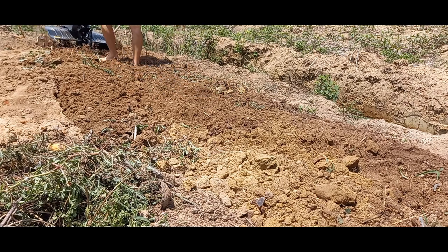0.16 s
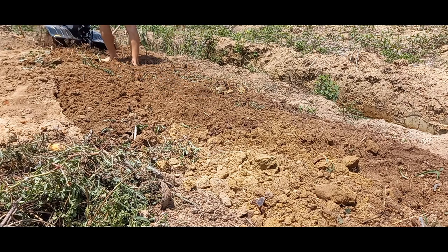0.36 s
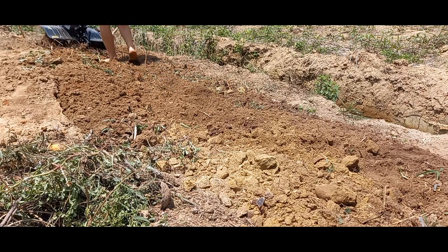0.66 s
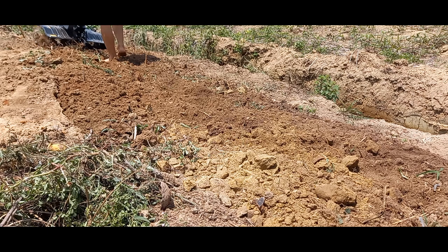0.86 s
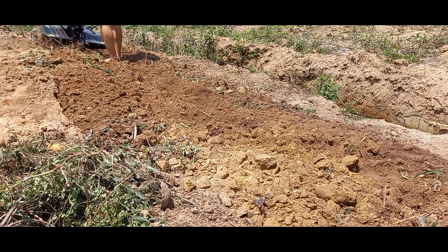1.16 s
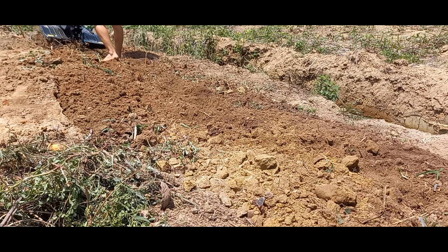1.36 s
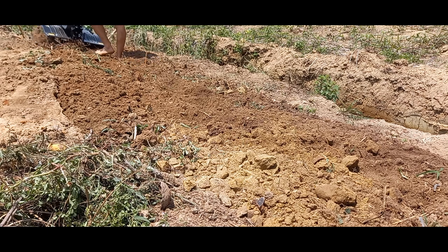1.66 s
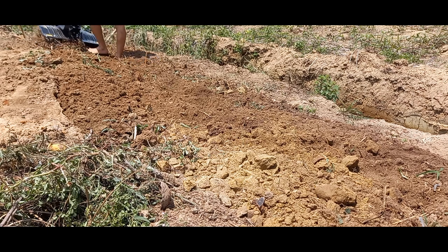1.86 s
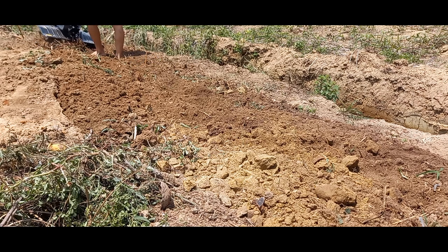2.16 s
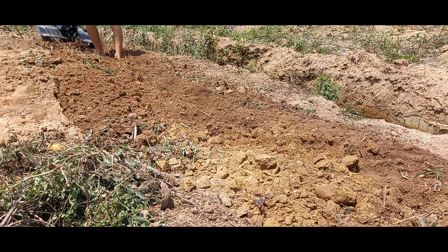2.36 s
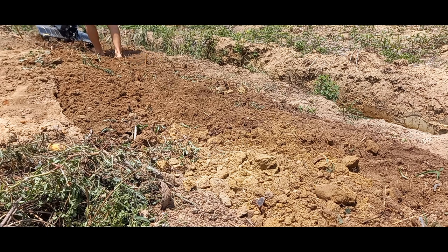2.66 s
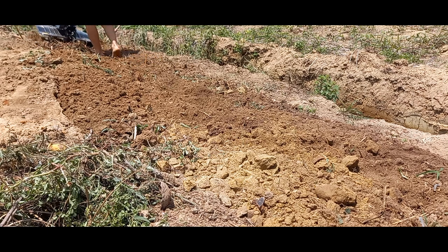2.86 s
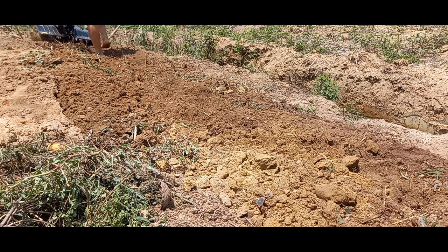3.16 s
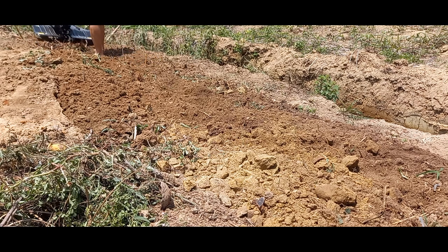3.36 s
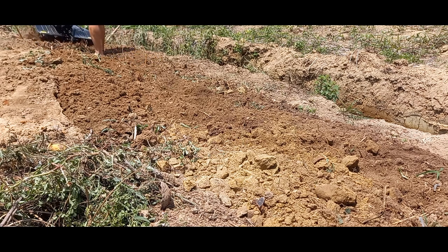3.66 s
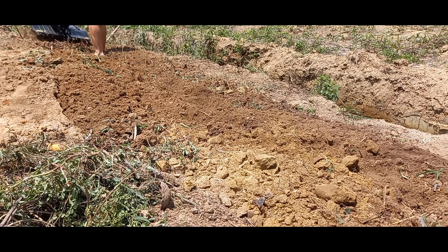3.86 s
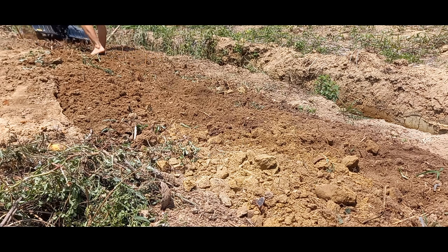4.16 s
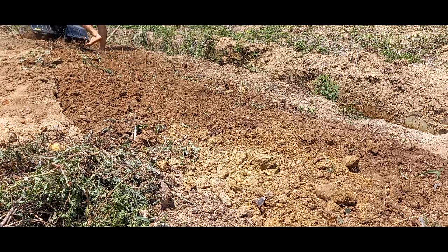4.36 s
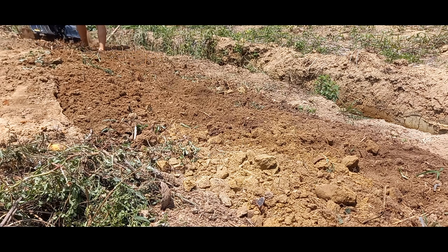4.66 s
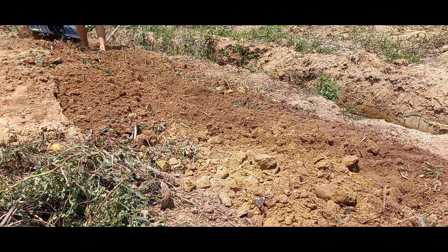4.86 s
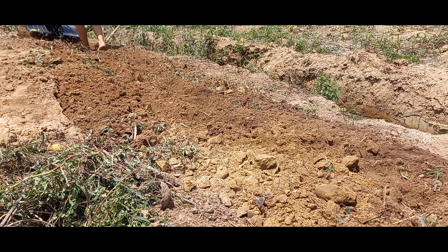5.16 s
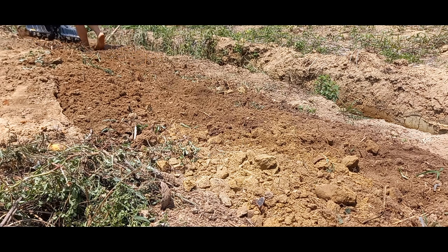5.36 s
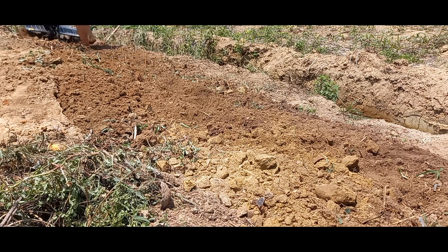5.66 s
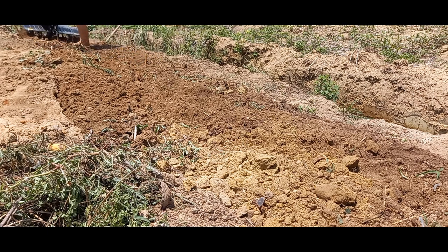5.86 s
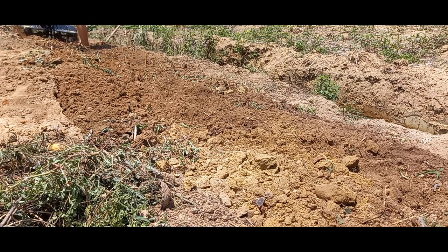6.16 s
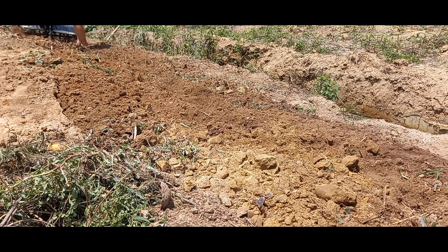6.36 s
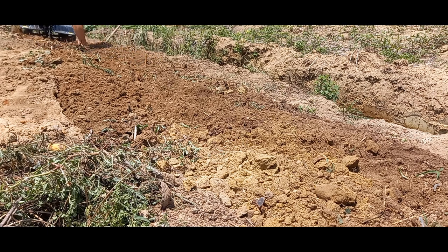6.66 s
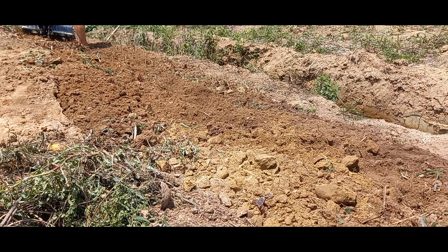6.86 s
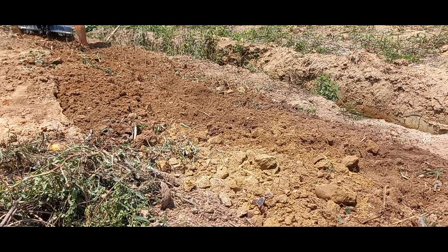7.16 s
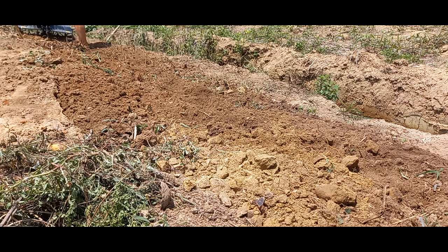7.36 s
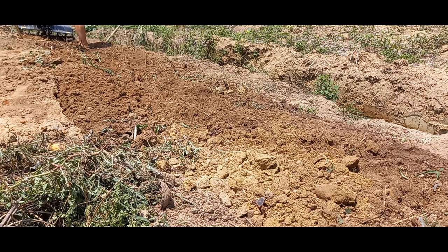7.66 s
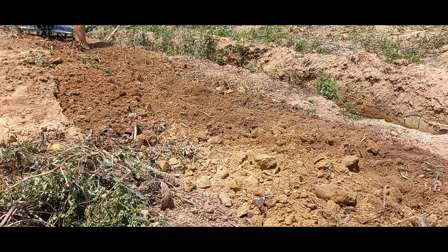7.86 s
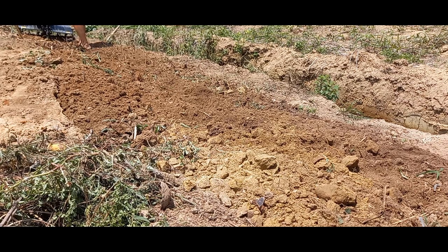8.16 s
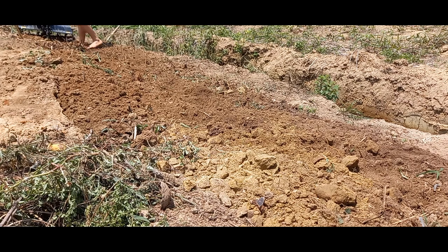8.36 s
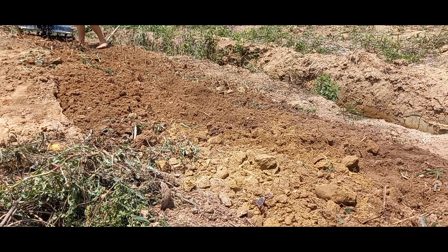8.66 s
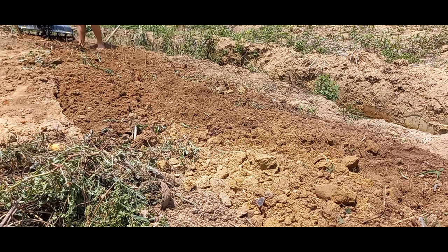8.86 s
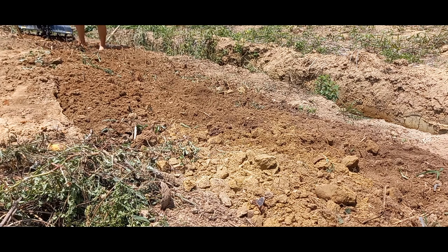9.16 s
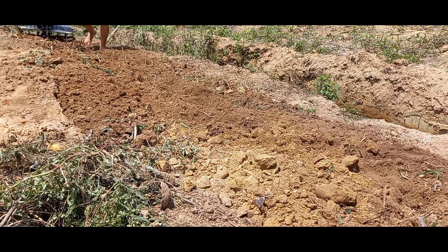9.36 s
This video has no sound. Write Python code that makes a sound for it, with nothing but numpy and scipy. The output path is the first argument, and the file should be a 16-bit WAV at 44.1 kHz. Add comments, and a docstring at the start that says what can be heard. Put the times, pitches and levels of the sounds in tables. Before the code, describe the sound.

A small single-cylinder four-stroke petrol tiller runs outdoors, to the left of a stereo microphone. From 0 to 7.2 seconds it fires steadily about 25 times a second: a deep muffler throb around 100 to 150 hertz, sharp engine clacks, rattling tin covers and uneven fan and belt whirr, slowly softening as it moves off while drive grinding grows. Dry crumbs patter, and tines scrape stones in short gritty hisses, notably near 1.5, 3.6, 4.2, 5.4 and 6.9 seconds. Harder piston slaps come around 0.8 to 1.1 and 5.6. At 7.25 the drive is released with a bright scrape; the engine lurches and stumbles. From 7.8 it coasts in duller, ever slower chuffs, with knocks strongest near 8.3 and low frame rings. After about 8.8, gulps of air and brief chain groans follow, with tiny scrapes near 9.3 and 9.5, still slowing at the end. A faint low rumble lies underneath.

```python
"""A single-cylinder four-stroke petrol tiller digs dry soil: each firing rings the muffler and clacks the engine.
Coloured noise, pulsed by the firings, gives gear whirr and rattling covers; grains patter and tines scrape stones.
Then the drive is let go, the scrapes lose their showers of soil, and the starved engine stumbles.
Last it coasts in ever slower chuffs with gulps of air, knocks, frame rings and chain groans, still slowing
at the end. A faint outdoor rumble, made of low noise, lies under it all."""
import sys
import numpy as np
from scipy import signal
from scipy.fft import rfft, irfft, next_fast_len
from scipy.io import wavfile
from scipy.ndimage import map_coordinates

SR = 44100
rng = np.random.default_rng(int(sys.argv[2]) if len(sys.argv) > 2 else 0)


def to_wav(sig):
    """Store sig (one row per channel, or 1-D mono) as 16-bit WAV at the path in sys.argv[1].

    Samples outside -1..1 are clipped; the rate is SR.
    """
    pcm = np.clip(np.atleast_2d(sig), -1, 1) * 32767
    pcm = np.round(pcm).astype(np.int16)
    wavfile.write(sys.argv[1], SR, pcm.T)  # frames by channels


N = 418950  # length in samples


def amp(db):
    """Decibels to gain."""
    return 10 ** (np.asarray(db) / 20)


def unit(x):
    """Scale to rms 1."""
    return x / np.sqrt(np.mean(x ** 2) + 1e-20)


def along(points, hz):
    """Read (frequency, value) points on a log frequency axis."""
    f, v = np.transpose(points)
    return np.interp(np.log(hz + 1), np.log(f + 1), v)


def curves(rows):
    """Draw one value per sample for each column after the time."""
    s, *cols = np.transpose(rows)
    return [np.interp(np.arange(N) / SR, s, c) for c in cols]


def wobble(rate):
    """A smooth random curve through `rate` random knots a second."""
    knots = rng.standard_normal(int(N * rate / SR) + 4)
    return map_coordinates(knots, [np.arange(N) * rate / SR])


def filtered(x, response):
    """Shape x by a complex response of frequency."""
    m = next_fast_len(N + SR // 2)
    spectrum = rfft(x, m) * response(np.fft.rfftfreq(m, 1 / SR))
    return irfft(spectrum, m)[..., :N]


def add(track, s, sound):
    """Mix a sound into a track at time s."""
    part = track[max(round(s * SR), 0):][:len(sound)]
    part += sound[:len(part)]


def strike(times, sizes, shape):
    """Place one scaled copy of the shape at each time."""
    blows = np.bincount(np.clip(times * SR, 0, N).astype(int), sizes, N + 1)
    return signal.fftconvolve(blows, shape)[:N]


def burst(rise, decay):
    """An envelope of peak 1 that swells and dies away (times in s)."""
    t = np.arange(SR // 4) / SR
    shape = (1 - np.exp(-(t / rise) ** 2)) * np.exp(-t / decay)
    return shape / shape.max()


# likeness of the left and right noise: hz, correlation
LIKENESS = [(30, 0.37), (70, 0.5), (150, 0.61), (450, 1), (650, 0.76), (1000, 1), (3500, 0.76),
            (4500, 0.73), (7000, 0.67), (10000, 0.2), (15000, .2)]


def noise(colour):
    """Coloured noise of rms 1 at both ports, mixed from mid and side so that it widens by frequency."""
    def response(hz):
        turn = np.arccos(np.clip(along(LIKENESS, hz), -1, 1)) / 2
        return amp(along(colour, hz)) * np.array([np.cos(turn), np.sin(turn)])
    mid, side = filtered(rng.standard_normal((2, N)), response)
    return unit(np.array([mid + side, mid - side]))


def resonant(modes):
    """The noise colour (Hz, dB) of a set of resonances; each is 6 dB down one width from its centre."""
    hz = np.arange(20, SR // 2, 5)
    power = sum(amp(db) ** 2 / (1 + ((hz - centre) / width) ** 2) ** 2 for centre, width, db in modes)
    return np.transpose([hz, 10 * np.log10(power + 1e-12)])


# engine speed under power: time_s, firings_per_s
ENGINE_SPEED = [(0.0, 24.534), (0.287, 25.352), (0.519, 24.675), (1.389, 25.405), (1.615, 24.59),
                (2.147, 25.183), (2.27, 24.519), (3.23, 24.728), (3.624, 25.166), (3.67, 24.478),
                (4.17, 25.31), (5.16, 24.531), (5.331, 25.513), (5.62, 24.195), (6.252, 25.095),
                (7.193, 24.667), (7.51, 26.74), (7.75, 23.079)]
COAST_S, COAST_RATE = 7.781, 24.44  # start of coasting (s), cycles a second then
FRICTION, BURN_OFF_S = 12.37, 0.09  # cycles a second lost each second, time for the last fuel to burn off (s)


def speed():
    """Engine cycles a second: driven by fuel, then braked by steady friction as the last fuel burns off."""
    t = np.arange(N) / SR
    since = np.maximum(t - COAST_S, 0)
    braked = since - BURN_OFF_S * (1 - np.exp(-since / BURN_OFF_S))
    return np.where(t < COAST_S, curves(ENGINE_SPEED)[0], COAST_RATE - FRICTION * braked)


def firings(jitter=0.0001):
    """One firing per engine cycle, with a slight timing jitter (s), until the power ends."""
    cycles = 0.1 + np.cumsum(curves(ENGINE_SPEED)[0]) / SR
    times = np.interp(np.arange(int(cycles[-1])), cycles, np.arange(N) / SR)
    times = times[times < ENGINE_SPEED[-1][0] + 0.01]
    return times + jitter * rng.standard_normal(len(times))


RELEASE_S, RELEASE_TAKES_S = 7.25, 0.1  # the drive is let go


def unloaded(t):
    """The load coming off: 0 while the tines dig, 1 once the drive is let go."""
    return np.clip((t - RELEASE_S) / RELEASE_TAKES_S, 0, 1)


def level(law):
    """A part's level in dB: it changes as the tiller moves off, sheds its load and slows."""
    start_db, away_db, released_db, slowed_db = law
    t, rate = np.arange(N) / SR, speed()
    moving_db = start_db + away_db * t
    return moving_db + released_db * unloaded(t) + slowed_db * np.log2(rate[0] / rate)


# how muffler pitch and knock strength change through the coast: time_s, muffler_pitch_ratio,
# knock_db (before the knock gain)
COAST_TONE = [(7.85, 1, -38), (8.02, .86, -32.5), (8.27, 1.09, -28), (8.55, 0.944, -32), (8.85, 0.9, -35.5),
              (9.4, 0.96, -43.5)]
# heavy lurches, as it stumbles and late in the coast: time_s, chuff_db, muffler_pitch_ratio,
# knock_db (before the knock gain)
HEAVY_LURCHES = [(7.394, -16, .62, -28), (7.779, -19, 0.84, -30), (7.9478, -14.5, 0.83, -29.5),
                 (9.339, -20, .74, -38.5)]
# in the slowest cycles, all but the last, a deep gulp of air follows each chuff
GULP_BELOW_RATE, GULP_AFTER_S = 12, 0.034  # cycles a second, s
GULP_DB, GULP_PITCH, GULP_KNOCK_DB = -18.5, 0.617, -47  # knock before the knock gain


def strokes(chuff_db=-9.0, halving_db=-6.0, scatter_db=1.3):
    """One chuff a cycle, softer as the engine slows, with gulps and lurches: s, chuff dB, pitch, knock dB."""
    t = np.arange(round(COAST_S * SR), N) / SR
    rate = speed()[-len(t):]
    cycles = np.cumsum(rate) / SR
    times = np.interp(np.arange(int(cycles[-1]) + 1), cycles, t)
    rates = np.interp(times, t, rate)
    s, pitch, knock_db = np.transpose(COAST_TONE)
    db = chuff_db + halving_db * np.log2(COAST_RATE / rates)
    db = db + scatter_db * rng.standard_normal(len(times))
    chuffs = np.column_stack([times, db, np.interp(times, s, pitch), np.interp(times, s, knock_db)])
    slow = times[rates < GULP_BELOW_RATE][:-1]
    gulps = [(s + GULP_AFTER_S, GULP_DB, GULP_PITCH, GULP_KNOCK_DB) for s in slow]
    return np.vstack([chuffs, gulps, HEAVY_LURCHES])


def muffler(colour, pitch=1, dull_db=0, corner_hz=170, size=8192):
    """The muffler's causal ring after one puff of gas, peak 1, losing dull_db an octave above the corner."""
    hz = np.fft.rfftfreq(size, 1 / SR)
    octaves = np.log2(np.clip(hz / corner_hz, 1, 4))  # the tilt stops two octaves up
    db = along(colour, hz / pitch) - dull_db * octaves
    # folding the cepstrum forward in time gives the minimum-phase ring
    cepstrum = irfft(np.log(amp(db)))
    folded = 2 * cepstrum[:size // 2] * (np.arange(size // 2) > 0)
    ring = -irfft(np.exp(rfft(folded, size)))
    return ring / np.abs(ring).max()


# muffler resonances while firing: hz, relative_db
FIRED_MUFFLER = [(25, -35), (50, -36), (78, -39.5), (99, 6.5), (124, 11), (150, 11.5), (174, -3),
                 (198, -12.5), (225, 2.5), (250, -3), (300, -10.5), (360, -31), (480, -27.5), (800, -50.5)]
# muffler resonances while coasting and for the unloaded share of the firings: hz, relative_db
COASTING_MUFFLER = [(25, -34), (50, -33), (75, -20), (100, -3.5), (135, 7), (165, -1.5), (198, -14),
                    (228, -5.5), (260, -15), (300, -13), (345, -24.5), (410, -44), (520, -34), (800, -65)]
# firing level (dB), its fall as the tiller moves off and its extra fall once starved of fuel
BOOM_DB, BOOM_DB_PER_S, STARVE_S, STARVE_DB_PER_S = -14, -0.1045, 7.6, -42
# weak chuffs are dull, strong ones bark: dividing level, tilt (dB an octave per dB), limit of the bark (dB)
SOFT_BELOW_DB, DULLING, BRIGHT_RANGE_DB = -13, 1.9, 2.3


def exhaust(times, coasting, scatter_db=0.5, coast_db=0, return_s=0.00766, return_share=0.11,
            light_share=0.25, light_pitch=1.1, heat_pitch=0.015, heat_swing=0.35):
    """Puffs ring the muffler, higher in hotter gas; part changes resonance when the load comes off."""
    def even(ring):  # equal power for every ring at the usual firing rate
        return ring * np.sqrt(SR * np.median(np.diff(times)) / np.sum(ring ** 2))

    starved = np.maximum(times - STARVE_S, 0)
    size_db = BOOM_DB + BOOM_DB_PER_S * times + STARVE_DB_PER_S * starved
    sizes = amp(size_db + scatter_db * rng.standard_normal(len(times)))
    light = np.clip(light_share, 0, 1) * unloaded(times)
    loaded = sizes * (1 - light)
    heat = np.interp(times * SR, np.arange(N), wobble(3))
    hot = np.clip(0.5 + heat_swing * heat, 0, 1)
    boom = strike(times, loaded * hot, even(muffler(FIRED_MUFFLER, 1 + heat_pitch)))
    boom += strike(times, loaded * (1 - hot), even(muffler(FIRED_MUFFLER, 1 - heat_pitch)))
    boom += strike(times, sizes * light, even(muffler(COASTING_MUFFLER, light_pitch)))
    for s, db, pitch, _ in coasting:
        dull_db = DULLING * max(SOFT_BELOW_DB - db, -BRIGHT_RANGE_DB)
        chuff = amp(db + coast_db) * muffler(COASTING_MUFFLER, pitch, dull_db)
        add(boom, s, chuff)
        add(boom, s + return_s / pitch, return_share * chuff)  # the wave returns from the pipe's open end
    return boom


# labouring spells in which every piston slap is hard: start_s, end_s, over_usual_slap_db
LABOURING_SPELLS = [(.78, 1.13, 6), (5.6, 5.72, 8), (6.13, 6.17, 7.5)]
# colour of the engine's clack: hz, relative_db_per_hz
CLACK_COLOUR = [(300, -22), (1200, -7), (2200, -12), (3200, -7.5), (4500, -11.5), (6200, 1.5), (8000, -8.5),
                (16000, -9.5)]
# colour of the rattling tin covers: hz, relative_db_per_hz
RATTLE_COLOUR = [(1000, -31.5), (3000, -9), (4000, -9), (5000, -6.5), (6400, -4.5), (7200, -10),
                 (9000, -16), (16000, -13.5)]


def clatter(times, rattle_db, clack_db=6.5, shake_db=0, loose_db=-4.0, scatter_db=1.0, slap_db=1,
            slap_spread_db=5.0):
    """Each firing gates noise into a clack and a piston slap of varied hardness, and shakes the tin covers."""
    sizes = amp(scatter_db * rng.standard_normal(len(times)))
    snap = burst(rise=0.0004, decay=0.003)
    clack = amp(clack_db) * strike(times + 0.00022, sizes, snap)
    hardness_db = slap_spread_db * np.minimum(rng.standard_normal(len(times)), 2)
    for start, end, db in LABOURING_SPELLS:
        hardness_db[(times > start) & (times < end)] = db
    slap = strike(times, amp(slap_db + hardness_db), burst(rise=0.00026, decay=0.0033))
    shake = strike(times, sizes, burst(rise=0.0058, decay=0.0063))
    loose = amp(loose_db + 1.68 * wobble(350))  # rattle that goes on between firings
    covers = np.hypot(amp(shake_db) * shake, loose)
    metal = np.hypot(clack, slap) * noise(CLACK_COLOUR) + covers * noise(RATTLE_COLOUR)
    return amp(rattle_db) * metal


# colour of the knocking drive: hz, relative_db_per_hz
KNOCK_COLOUR = [(400, -1.5), (800, -9.5), (1400, 1), (2200, -2.5), (3100, 5.5), (5500, -1.5), (7000, -4.5),
                (10000, -9), (16000, -17)]


def knocks(coasting, gain_db=5):
    """The slack drive knocks in noise bursts as the coasting piston labours over each compression."""
    envelope = np.zeros(N)
    for s, _, _, db in coasting:
        add(envelope, s - 0.002, amp(db + gain_db) * burst(rise=0.0019, decay=0.0097))
    return envelope * noise(KNOCK_COLOUR)


# frame modes: hz, re_chuff_db (before a random spread), t60_s
FRAME_MODES = [(83.3, -10.5, 0.23), (294, -22, 0.078), (327, -19, 0.1), (625, -28, 0.087)]


def frame(coasting, spread_db=2):
    """The lurching engine sets the frame's decaying sine modes ringing from one stroke into the next."""
    out, t = np.zeros(N), np.arange(SR // 4) / SR
    chance = rng.standard_normal((len(coasting), len(FRAME_MODES)))
    for (s, chuff_db, _, _), luck in zip(coasting, chance):
        for (hz, db, t60), change in zip(FRAME_MODES, luck):
            fade = np.exp(-np.log(1000) * t / t60) * (1 - np.exp(-t / 0.0084))
            gain = amp(chuff_db + db + spread_db * change)
            add(out, s, gain * fade * np.sin(2 * np.pi * hz * t))
    return out


# colour of the fan and belt whirr: hz, relative_db_per_hz
WHIRR_COLOUR = [(100, -14), (300, 3), (420, -7.5), (590, -7), (770, -17), (900, -9.5), (1200, -3),
                (1500, -4.5), (1720, -1.5), (1820, -10.5), (1980, -3), (2500, -6), (3200, -15),
                (5000, -22.5)]
# fan shroud resonances: hz, width_hz, relative_db
SHROUD_MODES = [(417, 25, -2), (880, 20, -6.5), (1031, 24, -1), (1158, 40, 0), (1250, 31, -3),
                (1751, 26, 0), (1974, 84, -2), (2170, 30, -2)]


def gears(times, whirr_db, gain_db=1, shroud_db=-5, surge_db=3.5):
    """Fan and belt noise whirrs unevenly through the shroud, surging with each firing."""
    surge = strike(times, np.ones(len(times)), burst(rise=0.0012, decay=0.0085))
    uneven_db = 1.3 * wobble(200) + 0.5 * wobble(17)
    level_db = whirr_db + gain_db + surge_db * (surge - 0.5) + uneven_db
    return amp(level_db) * (noise(WHIRR_COLOUR) + amp(shroud_db) * noise(resonant(SHROUD_MODES)))


# turning drive train, before gains and unevenness: time_s, grind_db, drone_db
DRIVE_LEVELS = [(0, -50, -42), (3, -38.5, -37), (4.5, -36.5, -41.5), (7.6, -33, -34), (8.9, -38.5, -42),
                (9.5, -42.5, -60)]
# drive casing resonances: hz, width_hz, relative_db
CASING_MODES = [(1222, 98, -3.5), (1450, 39, -6), (1636, 80, -1), (1995, 180, -8.5), (2350, 110, -9),
                (2564, 38, -2.5), (3040, 420, -3.5), (4140, 230, -10.5), (4670, 120, -10.5),
                (5260, 91, -9.5), (5540, 89, -12), (5780, 74, -14)]
# tine guard resonances: hz, width_hz, relative_db
GUARD_MODES = [(320, 38, 3.5), (502, 18.4, 0), (601, 29, -3), (963, 23, -5)]


def drive(grind_db=2, drone_db=0, uneven_db=2):
    """Chain and gears grind as noise through their casing's resonances and shake the guard into a drone."""
    grind, drone = curves(DRIVE_LEVELS)
    casing = amp(grind + grind_db + uneven_db * wobble(70)) * noise(resonant(CASING_MODES))
    return casing + amp(drone + drone_db) * noise(resonant(GUARD_MODES))


# groans of the slowing chain: time_s, level_db, pitch_hz
CHAIN_GROANS = [(8.799, -39, 1270), (8.884, -37, 1340), (9.081, -37.5, 1225), (9.29, -33.5, 1475),
                (9.47, -35, 1500)]


def groans(gain_db=0, width_hz=60):
    """The slowing chain groans: each groan is a short swell of noise through one narrow resonance."""
    out, size = np.zeros(N), SR // 4
    for s, db, hz in CHAIN_GROANS:
        colour = amp(along(resonant([(hz, width_hz, 0)]), np.fft.rfftfreq(size, 1 / SR)))
        ring = unit(irfft(rfft(rng.standard_normal(size)) * colour, size))
        add(out, s, amp(db + gain_db) * burst(rise=0.006, decay=0.07) * ring)
    return out


# tines scraping stones: start_s, level_db (before the slipping), ring_hz, decay_s
STONE_SCRAPES = [(0.605, -28, 5600, 0.046), (1.516, -17, 4830, 0.035), (2.394, -27, 5700, 0.094),
                 (3.63, -20.5, 5850, 0.051), (4.194, -20.5, 5030, 0.045), (5.444, -21, 5100, 0.022),
                 (6.016, -27, 5700, 0.087), (6.913, -20.5, 4840, 0.03), (6.961, -23.5, 5200, 0.036),
                 (7.25, -16.5, 6350, 0.022), (9.323, -29.5, 6000, 0.0089), (9.472, -33.5, 5260, 0.019)]


def tines(gain_db=0, width_hz=950, hiss_db=-8):
    """A tine drags over a stone: a short gritty hiss with a broad steel ring, catching and slipping."""
    out, size = np.zeros((2, N)), SR // 4
    hz = np.fft.rfftfreq(size, 1 / SR)
    for s, db, ring_hz, length in STONE_SCRAPES:
        ring = np.exp(-((hz - ring_hz) / width_hz) ** 2 / 2)
        colour = ring + amp(hiss_db) * hz ** 2 / (hz ** 2 + 3500 ** 2)
        shared, *own = irfft(rfft(rng.standard_normal((3, size))) * colour, size)
        envelope = amp(db + gain_db) * burst(rise=0.0057, decay=length)
        for port, part in zip(out, own):
            add(port, s, envelope * unit(shared + 1.7 * part))
    return out * amp(-3 * np.abs(wobble(600)))  # the steel catches and slips on the grit


# colour of the pattering soil: hz, relative_db_per_hz
GRIT_COLOUR = [(4000, -35), (7000, -9), (9000, 5.5), (16000, -16)]


def soil(grit_db, shower_db=-31.5, crumb_db=3, count=900):
    """Crumbs of dry earth patter on the guard in noise ticks; each stone dug under load adds a shower."""
    when, hardness = rng.random(count), rng.exponential(size=count)
    crumbs = amp(crumb_db * np.minimum(hardness, 4))  # a few much harder than the rest
    patter = strike(when * N / SR, crumbs, burst(rise=0.0003, decay=0.0044))
    flow = amp(grit_db)
    for s, *_ in STONE_SCRAPES:
        add(flow, s, amp(shower_db) * (1 - unloaded(s)) * burst(rise=0.006, decay=0.055))
    return flow * unit(patter) * noise(GRIT_COLOUR)


# colour of the outdoor rumble: hz, relative_db_per_hz
RUMBLE_COLOUR = [(15, -32), (30, -21.5), (50, -10.5), (80, 5), (150, -4.5), (300, -23), (1000, -61)]


def rumble():
    """Faint outdoor rumble: low noise whose level drifts."""
    return amp(-34.5 + 1.1 * wobble(5.5)) * noise(RUMBLE_COLOUR)


# lead of the left port over the right: hz, lead_s
LEFT_LEAD = [(300, 0.00021), (1000, 0.00023), (2000, 0.00018), (2700, 0.0002), (3600, 0.00017),
             (4500, 0.00023), (6500, 0.00019), (12000, 0.000204)]


def from_the_left(sound):
    """Sound from the left reaches the left port first: half the lead is a phase advance, half a delay."""
    sides = np.array([[1], [-1]])
    return filtered(sound, lambda hz: np.exp(np.pi * 1j * hz * along(LEFT_LEAD, hz) * sides))


# part levels, before each part's own gains: start_db, moving_off_db_per_s, drive_let_go_db, per_halved_speed_db
RATTLE_LEVEL = (-27.5, -0.4236, -4.5, -10)
# the same columns for the whirr
WHIRR_LEVEL = (-28, -0.7124, -1.5, -12)
# the same columns for the soil
GRIT_LEVEL = (-45.5, 0, -5, -20)


def scene():
    """The tiller stands off to the left, in a faint outdoor rumble."""
    times, coasting = firings(), strokes()
    engine = exhaust(times, coasting) + clatter(times, level(RATTLE_LEVEL))
    engine = engine + knocks(coasting) + frame(coasting)
    machine = engine + gears(times, level(WHIRR_LEVEL)) + drive() + groans()
    tiller = machine + tines() + soil(level(GRIT_LEVEL))
    return from_the_left(tiller) + rumble()


# colour shared by both microphone ports: hz, level_db
PORT_COLOUR = [(6600, 1), (7200, -11), (8150, -44), (9100, -19.5), (10500, -18), (11300, -11.5),
               (12300, -18.5), (14000, -29.5), (14700, -16), (15400, -7.5), (15900, -37)]
# balance of the ports: hz, left_minus_right_db
PORT_BALANCE = [(110, -1), (200, 0.2), (380, -0.5), (650, -2), (1290, 2), (2400, 0), (3900, -1), (4800, 0),
                (6200, 2.5), (15000, 2)]
TOP_HZ = 15900  # band limit


def record(dry):
    """The ports share one colour, differ in balance by frequency, and pass nothing above the band limit."""
    def response(hz):
        balance_db = along(PORT_BALANCE, hz) * np.array([[0.5], [-0.5]])
        return amp(along(PORT_COLOUR, hz) + balance_db) * (hz < TOP_HZ)
    return filtered(dry, response)


dry = scene()
out = record(dry)
to_wav(out)
```